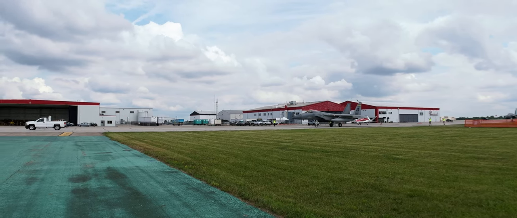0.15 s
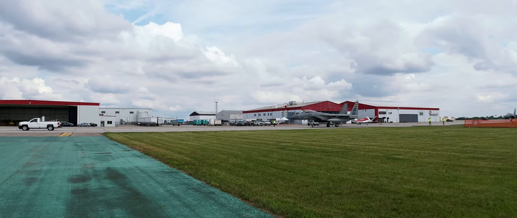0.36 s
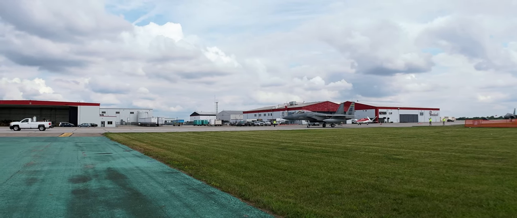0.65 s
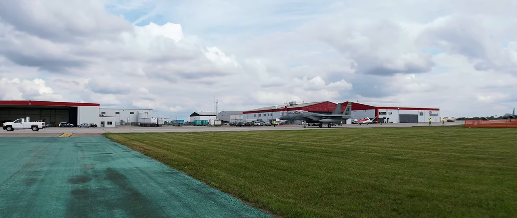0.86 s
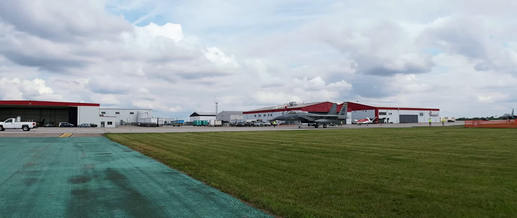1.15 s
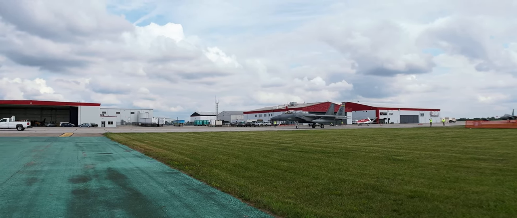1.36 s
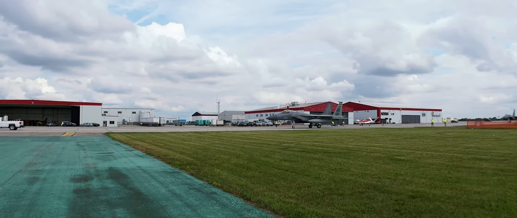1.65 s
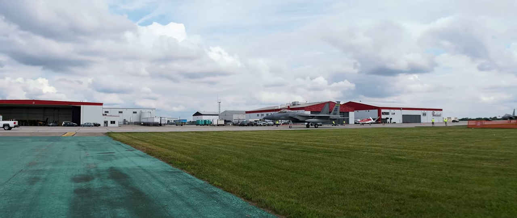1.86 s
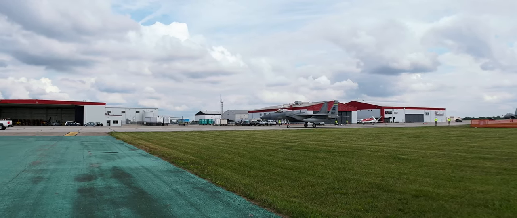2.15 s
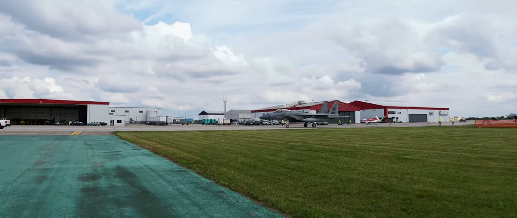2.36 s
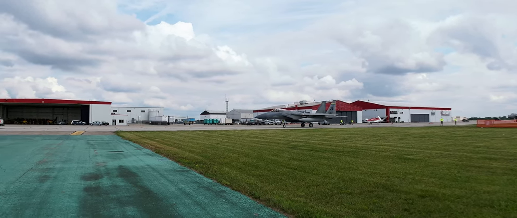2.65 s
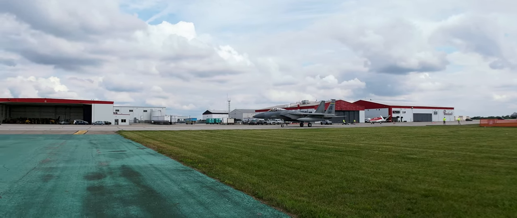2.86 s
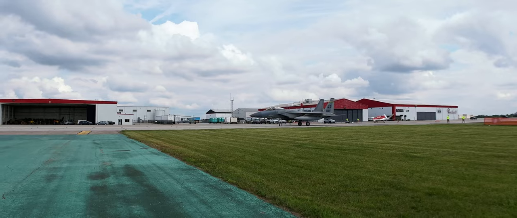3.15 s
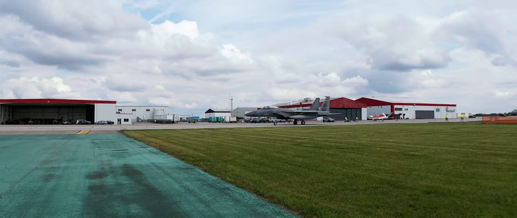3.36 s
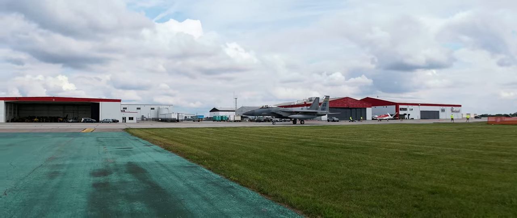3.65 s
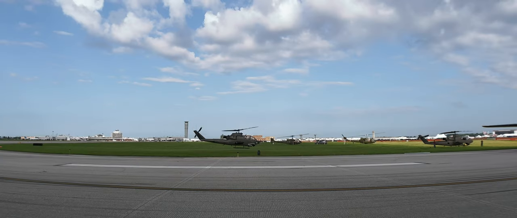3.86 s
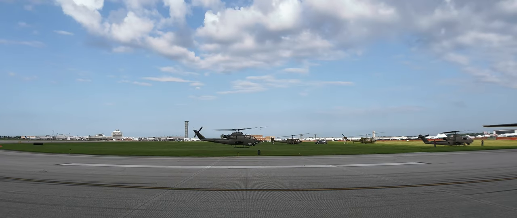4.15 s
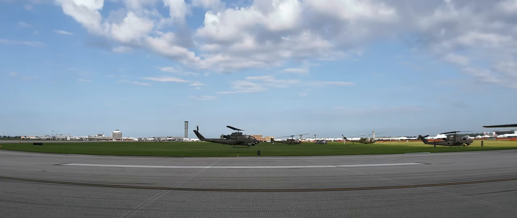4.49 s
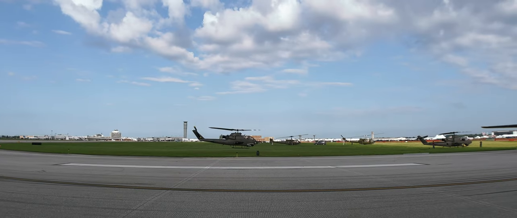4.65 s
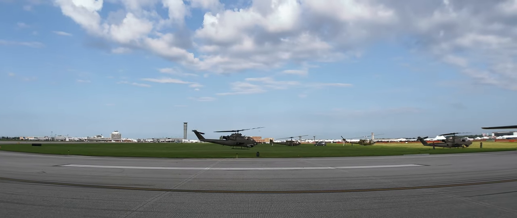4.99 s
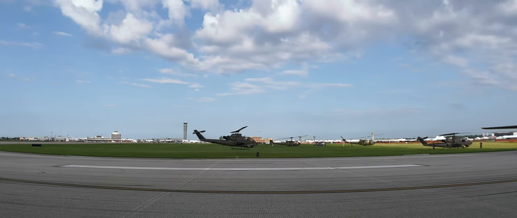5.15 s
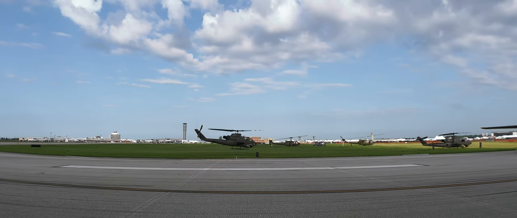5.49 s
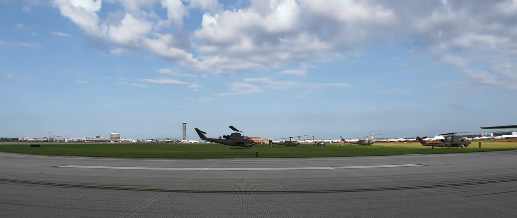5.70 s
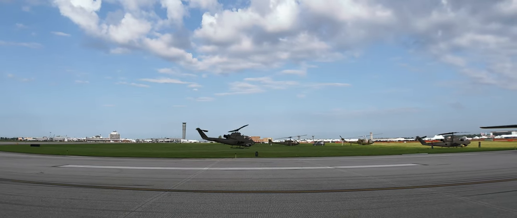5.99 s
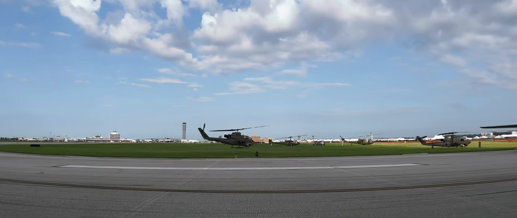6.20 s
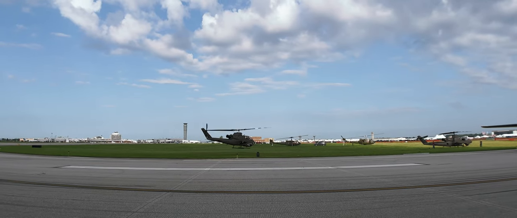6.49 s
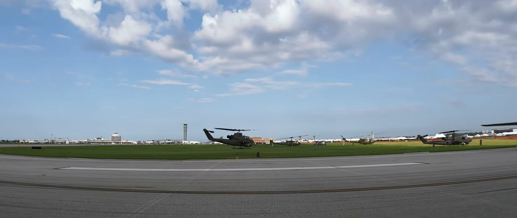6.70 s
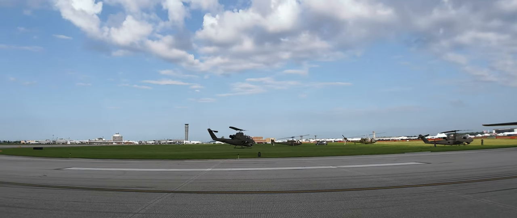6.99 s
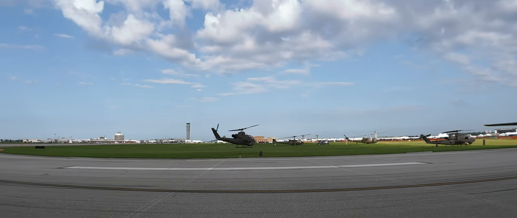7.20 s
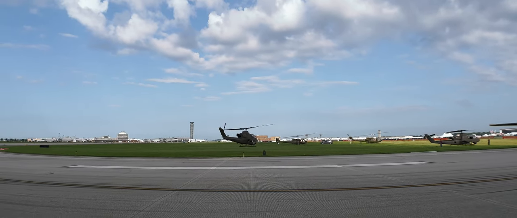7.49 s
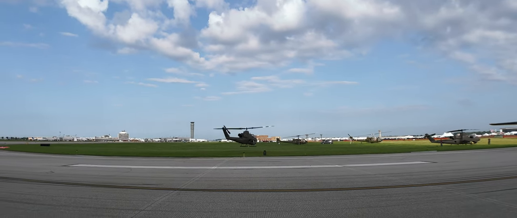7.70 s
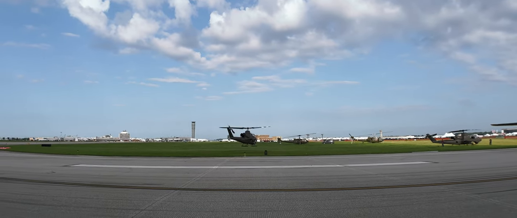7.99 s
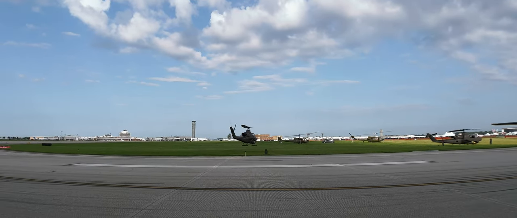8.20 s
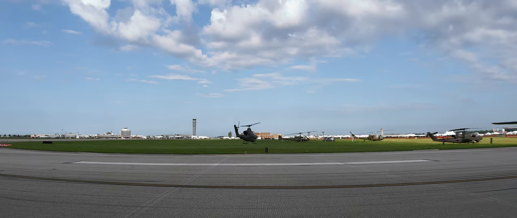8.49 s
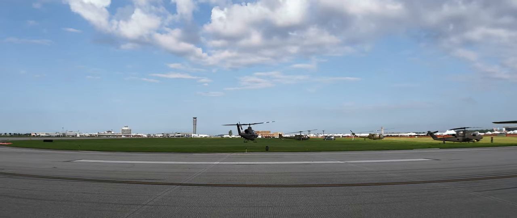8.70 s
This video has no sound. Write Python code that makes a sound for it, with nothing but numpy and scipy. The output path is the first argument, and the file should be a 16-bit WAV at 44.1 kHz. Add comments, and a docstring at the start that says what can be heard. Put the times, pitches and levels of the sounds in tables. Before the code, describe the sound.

On an open airfield, a jet taxis by with fluttering, breathy turbine whines, hiss and a low distant roar while wind gusts thump the microphone. A hard cut brings a hovering helicopter: fast even rotor thumps and swishes, buzzing tail rotor hum, churning air and exhaust. Scattered sharp cracks and a sinking roar follow, then dry blade slaps hit on every pass to the end.

```python
"""An airfield heard from its open edge on two close microphone ports, in two scenes joined by a hard cut.
First a fighter jet taxis by: narrow bands of noise make its turbine whines, beside hiss, roar and wind on the microphone.
Then a two-bladed helicopter hovers and turns: blade pulses thump and gated noise swishes 11 times a second, while
tail rotor harmonics and ragged noise hum and rasp at 55 Hz against those of a parked helicopter.
Volleys of cracks make sharp blade slaps, scattered at first, then on every pass of the main rotor."""
import sys
import numpy as np
from scipy import signal
from scipy.fft import rfft, irfft, next_fast_len
from scipy.io import wavfile
from scipy.ndimage import uniform_filter1d

SR = 44100
rng = np.random.default_rng(int(sys.argv[2]) if len(sys.argv) > 2 else 0)


def materialize(psi):
    """Save the field psi as 16-bit PCM at rate SR to the path in sys.argv[1].

    A 1-D psi becomes a single channel; in a 2-D psi each row is a channel.
    """
    bounded = np.clip(np.atleast_2d(psi).T, -1, 1)
    quanta = np.round(bounded * 32767).astype(np.int16)
    wavfile.write(sys.argv[1], SR, quanta)


N = 389844
T = np.arange(N) / SR  # time [s]
CUT_S = 3.838  # the jet gives way to the helicopter


def undb(db):
    """Decibels to gain."""
    return 10 ** (np.asarray(db) / 20)


def unit(x):
    """Scale to rms 1."""
    return x / np.sqrt(np.mean(x ** 2))


def curves(table):
    """Each column of a table, joined by straight lines in time."""
    s, *columns = np.transpose(table)
    return [np.interp(T, s, column) for column in columns]


def over_bins(points, size):
    """(Hz, value) points on the bins of an FFT, joined on a log-frequency axis."""
    hz, value = np.transpose(points)
    bins_hz = np.arange(size // 2 + 1) * SR / size
    return np.interp(np.log(bins_hz + 1), np.log(hz), value)


def colour(x, points, size=8192):
    """Minimum-phase filter with the given spectrum: the lows of a pulse arrive last."""
    cepstrum = irfft(np.log(undb(over_bins(points, size))))
    # folding the cepstrum forwards makes the filter causal
    cepstrum[1:size // 2] *= 2
    cepstrum[size // 2 + 1:] = 0
    response = irfft(np.exp(rfft(cepstrum)))
    return signal.oaconvolve(x, response)[:N]


def noise(points):
    """Turbulence with the given spectrum, rms 1."""
    return unit(colour(rng.standard_normal(N), points))


def walk(rate):
    """Random levels held for 1 / rate s and smoothed twice; rms 1."""
    hold = max(int(SR / rate), 1)
    steps = np.repeat(rng.standard_normal(N // hold + 1), hold)
    smooth = uniform_filter1d(uniform_filter1d(steps, hold), hold)
    return unit(smooth[:N])


def grit(points, rate, rough_db):
    """Turbulence that arrives in short clumps with hollows between them; rms 1."""
    clumps = undb(rough_db * walk(rate)) * rng.standard_normal(N)
    return unit(colour(clumps, points))


def whine(hz, width_hz, steady=0):
    """A blade tone smeared into a narrow band by turbulent air; steady (0-1) evens out its level."""
    size = next_fast_len(N)
    f = np.arange(size) * SR / size
    band = (1 + (1.6 * (f - hz) / width_hz) ** 2) ** -1.4
    # positive frequencies alone give a complex tone, whose magnitude is its envelope
    tone = np.fft.ifft(np.fft.fft(rng.standard_normal(size)) * band)[:N]
    return unit(tone.real / np.abs(tone) ** np.clip(steady, 0, 1))


def bursts(events):
    """A bell-shaped swell for each (s, dB, half length s) event."""
    out = np.zeros(N)
    for s, db, half in events:
        near = slice(*np.searchsorted(T, [s - 10 * half, s + 10 * half]))
        out[near] += undb(db) * np.exp(-((T[near] - s) / half) ** 2 / 2)
    return out


def with_energy(x, envelope, size=2400):
    """Give each separate burst in x the energy of its envelope, averaged over size samples."""
    wanted, found = (np.abs(uniform_filter1d(v ** 2, size)) for v in (envelope, x))
    return x * np.sqrt(wanted / (found + 1e-12))


def gate(turns, depth_db, rise=0.42):
    """A swell that peaks at each whole blade count and rises for a share of the cycle; rms 1."""
    rise = np.clip(rise, .05, .95)
    cycle = (turns + rise) % 1
    triangle = np.minimum(cycle / rise, (1 - cycle) / (1 - rise))
    return unit(undb(depth_db * triangle))


def pulses(turns, scatter_db):
    """One pressure pulse for each passing blade, each with its own size."""
    blade_count = np.floor(turns)
    passes = np.diff(blade_count, prepend=blade_count[0])
    return passes * undb(scatter_db * rng.standard_normal(N))


def jet():
    """Turbine whines and intake hiss that flutter in the moving air, over a low roar."""
    # levels as the jet passes, before the offsets below: (time [s], whine [dB], hiss [dB])
    jet_levels = [(0.0, -27, -35), (0.12, -23, -36.5), (0.19, -23, -33), (0.87, -26, -33.5),
                  (1.06, -28.5, -41), (1.2, -31.5, -38), (1.48, -33, -44), (1.57, -29.5, -36.5),
                  (1.87, -29, -39.5), (2.12, -24, -32), (2.42, -34, -43), (2.79, -27, -38.5),
                  (3.11, -34, -43), (3.2, -29.5, -39), (3.54, -33, -41), (3.8, -31.5, -40)]
    # spectra of the near hiss and of the distant roar: (frequency [Hz], level [dB])
    hiss_spectrum = [(2000, -26.5), (3400, -15), (4000, -8), (5000, -3.5), (5600, 6.5), (6300, -7.5),
                     (7300, -2.5), (8200, -16), (10000, -6.5), (12000, -19), (13100, -23), (14000, -64)]
    roar_spectrum = [(40, -12), (90, 9.5), (250, -15), (600, -9.5), (1000, -9.5), (1300, 3.5), (1600, -5.5),
                     (1900, -4), (2300, 0.5), (3200, -1), (6000, -33)]
    fan_hz, compressor_hz = 2786, 4495
    fan_db, compressor_db, hiss_offset_db = -5, -2, 4.5  # against the whine and hiss levels

    whine_db, hiss_db = curves(jet_levels)
    flutter = walk(80)  # shared by compressor and hiss
    broad_fan = whine(fan_hz, width_hz=210, steady=0.14)
    narrow_fan = whine(fan_hz, width_hz=4.9, steady=0.61)
    fan = undb(whine_db + fan_db + 0.65 * walk(60)) * (broad_fan + undb(-7) * narrow_fan)
    compressor_tone = whine(compressor_hz, width_hz=344, steady=0.089)
    compressor = undb(whine_db + compressor_db + 0.95 * flutter) * compressor_tone
    # the low whine follows only a quarter of the whine's rise and fall in dB
    low_whine_db = -49.0 + .25 * (whine_db - whine_db.mean()) + .5 * walk(8.1)
    low_whine = undb(low_whine_db) * whine(hz=1554, width_hz=270)
    hiss = undb(hiss_db + hiss_offset_db + 0.38 * flutter) * noise(hiss_spectrum)
    roar = undb(-45.0 + walk(9.06)) * noise(roar_spectrum)
    return fan + compressor + low_whine + hiss + roar


def wind():
    """Eddies rumble on the microphone; a strong one bursts as a puff and leaves a brief rumble behind."""
    # two gusts, then a light breeze: (time [s], level [dB], unevenness [dB])
    wind_levels = [(0, -25, 2), (.12, -32, -1), (.17, -35, 4.5), (.42, -37, 0.5), (.56, -31, 4),
                   (.69, -29, 2.5), (.76, -56, 12), (1.8, -60.5, 9), (2.7, -50, 2.5), (3.8, -47, 4.5)]
    # spectrum of the steady rumble: (frequency [Hz], level [dB])
    wind_spectrum = [(20, -26), (32, -18), (50, 0), (85, 5.5), (150, -1.5), (280, -8.5), (450, -15.5),
                     (900, -51), (3000, -77)]
    # separate eddies: (time [s], front level [dB], trailing rumble level [dB])
    eddy_events = [(0.025, -31, -31), (0.048, -31, -42), (0.077, -28, -25), (0.121, -27, -35),
                   (0.193, -30.5, -42), (0.267, -33, -42), (0.294, -33.5, -40), (0.495, -36, -33),
                   (0.551, -27.5, -26), (0.598, -40, -39), (0.638, -34, -37), (0.679, -23.5, -43),
                   (0.754, -41, -51.0), (0.815, -37, -53), (1.106, -36, -40), (1.164, -36, -39),
                   (1.227, -47, -47), (1.325, -43, -43), (1.345, -46, -47), (1.383, -50, -46),
                   (1.449, -41, -45), (1.478, -45, -54), (1.812, -43, -56), (1.965, -41, -48),
                   (1.993, -36, -40), (2.033, -48, -46), (2.224, -40.5, -39), (2.256, -46, -57),
                   (2.428, -43, -58), (2.501, -35, -47), (2.592, -38, -40), (2.654, -38.5, -44),
                   (2.707, -43, -51), (2.735, -43, -48), (2.873, -42.5, -43), (3.05, -42, -54),
                   (3.194, -40, -48.0), (3.279, -39, -43.0), (3.313, -40, -47), (3.34, -42, -51),
                   (3.377, -37, -42), (3.439, -51, -48), (3.525, -44, -52), (3.565, -46, -42),
                   (3.801, -36, -38)]
    # spectra of a front in a gust, a front in a breeze, and the trailing rumble: (frequency [Hz], level [dB])
    gust_spectrum = [(60, -26), (150, -4), (250, 8), (380, -7.5), (600, -16.5), (1200, -38)]
    breeze_spectrum = [(60, -27), (150, -2.5), (260, 0.5), (500, -3.5), (800, -11), (1500, -42)]
    wake_spectrum = [(20, -36), (50, -0.5), (90, 1.5), (160, -2.5), (280, -16.5), (600, -46)]
    front_half_s, wake_half_s, wake_lag_s = 0.0043, 0.012, 0.015
    full_gust_db, small_puff_db = -34, -58
    buffets_per_s = 25  # how fast the wind wavers

    wind_db, uneven_db = curves(wind_levels)
    rumble = undb(wind_db + uneven_db * walk(buffets_per_s)) * noise(wind_spectrum)
    fronts = bursts([(s, db, front_half_s) for s, db, _ in eddy_events])
    wakes = bursts([(s + wake_lag_s, db, wake_half_s) for s, _, db in eddy_events])
    # the eddies of a gust are larger and so duller
    gust = np.clip(undb(wind_db - full_gust_db), 0, 1)
    eddies = np.sqrt(gust) * noise(gust_spectrum) + np.sqrt(1 - gust) * noise(breeze_spectrum)
    front_puffs = with_energy(fronts * eddies, fronts)
    wake_rumbles = with_energy(wakes * noise(wake_spectrum), wakes)
    small_puffs = undb(small_puff_db) * grit(breeze_spectrum, rate=54, rough_db=5.0)
    return rumble + front_puffs + wake_rumbles + small_puffs


def main_rotor(blades, thump_db):
    """Each blade pushes out a low thump, and its tip hisses as it swings towards the listener."""
    # spectra of the low thump and of the tip hiss: (frequency [Hz], level [dB])
    thump_spectrum = [(15, -65), (33, -41), (55, -3), (80, 2.5), (130, -13), (230, -4), (350, -3.5),
                      (480, -10.5), (900, -34), (2500, -85)]
    swish_spectrum = [(1500, 16), (3500, -3), (5500, 6), (7500, 12), (10000, 13), (12500, 9.5),
                      (14500, 0.5)]
    swish_start_db, swish_fade_db_per_s = -40, 1  # fading as the helicopter turns away

    blade_pulses = pulses(blades + .02, scatter_db=2.5)
    thump = undb(thump_db) * unit(colour(blade_pulses, thump_spectrum))
    swish_db = swish_start_db - swish_fade_db_per_s * (T - CUT_S)
    tip_hiss = gate(blades, depth_db=17.5, rise=0.34) * noise(swish_spectrum)
    swish = undb(swish_db + 2 * walk(60)) * tip_hiss
    return swish - thump


def harmonics(turns, levels_db, tilt_db=0):
    """One rounded pulse per blade, from the second harmonic up; harmonics are staggered in phase."""
    trail_rad = 8  # lag per unit of log harmonic number
    out = 0
    for k, db in enumerate(levels_db, 2):
        phase = k * (2 * np.pi * turns + .5) - trail_rad * np.log(k)
        out = out + undb(db + tilt_db * (k - 2)) * np.cos(phase)
    return out


def rasp(turns):
    """Every tail blade gives one ragged crack as it cuts the wake, some harder than others; rms 1."""
    # spectrum of the ragged cracks: (frequency [Hz], level [dB])
    rasp_spectrum = [(300, -5.5), (550, 6.5), (800, 13.5), (1100, 5.5), (1450, -6.5), (1800, 4.5),
                     (2300, -2.5), (2800, -6.5), (3400, -20), (8000, -26)]
    cut = gate(turns + .012 * walk(25), depth_db=50, rise=.35)
    torn_air = colour(cut * rng.standard_normal(N), rasp_spectrum)
    cracks = with_energy(torn_air, cut, size=800)
    return unit(cracks * undb(walk(12)))  # strength wavers by 1 dB rms


def tail_rotor(turns, rasp_db):
    """Small fast blades: thickness makes a pulse train that brightens as it grows, thrust a drone, wake a rasp."""
    # louder as the tail swings round, before the hum offset: (time [s], hum [dB], drone [dB])
    tail_levels = [(3.84, -39.5, -41), (4.6, -37.5, -45), (5.8, -37.5, -40), (6.7, -31.5, -30),
                   (7.4, -29, -34.5), (8.1, -24.5, -33.5), (8.84, -22.5, -33)]
    # hum harmonics from twice the blade rate upwards: [level, dB]
    tail_harmonics_db = [5.5, 3, 0, -4, -8, -14, -21]
    brighten = 0.18  # dB more for each higher harmonic, per dB of hum
    side_on_db = -25.5  # hum level, before its offset, with the tail side-on

    hum_db, drone_db = curves(tail_levels)
    pulse = harmonics(turns, tail_harmonics_db, brighten * (hum_db - side_on_db))
    hum = undb(hum_db + 2.5 + .4 * walk(11)) * unit(pulse)
    drone = undb(drone_db + walk(4.43)) * np.sqrt(2) * np.cos(2 * np.pi * turns + 1)
    return drone + hum + undb(rasp_db) * rasp(turns)


def parked_helicopter(wash_db):
    """A second tail rotor runs a little faster; its hum and rasp beat against the first."""
    # hum harmonics from twice the blade rate upwards: [level, dB]
    parked_harmonics_db = [-6.5, -1.5, 1.5, -5, -3, -7, -9]
    blade_rate_hz = 58.4
    hum_db, rasp_db = -2.5, -6.5  # against the wash level

    turns = np.cumsum(blade_rate_hz * (1 + .003 * walk(3))) / SR
    hum = undb(hum_db + 2 * walk(6)) * unit(harmonics(turns, parked_harmonics_db))
    return undb(wash_db) * (hum + undb(rasp_db) * rasp(turns))


def downwash(blades, tail_turns, churn_db, wash_db, exhaust_db):
    """Clumps of torn air and turbine exhaust, fluttering with the tail rotor, throbbing with the main one."""
    # spectra of low churn, wash and turbine exhaust: (frequency [Hz], level [dB])
    churn_spectrum = [(20, -55), (36, -21), (52, 2), (100, -3), (220, 3), (350, -3.5), (480, -15.5),
                      (900, -37), (2000, -47)]
    wash_spectrum = [(150, -3), (400, -1), (750, 1), (1000, -11.5), (1400, -12), (2500, -26.5),
                     (6000, -55.5)]
    exhaust_spectrum = [(600, -3.5), (1200, 3.5), (1750, 3.5), (2400, 0.5), (3300, -9.5), (4200, -6.5),
                        (5200, -1), (6500, -7.5), (8500, -12.5), (14000, -21)]
    wash_offset_db, exhaust_offset_db = 3, 3.5  # against the wash and exhaust levels

    chop = gate(tail_turns, depth_db=2.0, rise=0.12)
    throb = gate(blades, depth_db=2.5) * undb(walk(30))
    churn_clumps = grit(churn_spectrum, rate=65, rough_db=-0.5)
    churn = undb(churn_db) * gate(blades, depth_db=5.5, rise=0.29) * churn_clumps
    wash = undb(wash_db + wash_offset_db) * grit(wash_spectrum, rate=190, rough_db=2.4)
    exhaust = undb(exhaust_db + exhaust_offset_db) * grit(exhaust_spectrum, rate=260, rough_db=1.3)
    return churn + chop * throb * (wash + exhaust)


def surge(blades):
    """A broad resonance of churned air slides downwards, in lumps that throb with the blades."""
    # a roar swells and sinks as the wash sweeps past: (time [s], centre [Hz], level [dB])
    surge_path = [(3.84, 800, -54), (4.5, 780, -40), (4.95, 760, -39), (5.3, 630, -38), (5.52, 380, -31),
                  (5.72, 272, -27), (5.9, 220, -34), (6.2, 200, -49), (7, 200, -58)]
    width_octaves, lumps_db = 0.47, 2.5

    centre_hz, surge_db = curves(surge_path)
    out = power = 0
    # half-octave bands of noise are faded in and out around the moving centre
    for hz in 150 * 2 ** (np.arange(7) / 2):
        edges_hz = [hz / 2 ** .25, hz * 2 ** .25]
        band_filter = signal.butter(2, edges_hz, "bandpass", fs=SR, output="sos")
        band = signal.sosfilt(band_filter, rng.standard_normal(N))
        weight = np.exp(-(np.log2(hz / centre_hz) / width_octaves) ** 2 / 2)
        out = out + weight * unit(band)
        power = power + weight ** 2
    level = undb(surge_db + lumps_db * walk(45))
    return level * gate(blades, depth_db=0.5) * out / np.sqrt(power)


def blade_slaps():
    """Sharp slaps of the rotor blades, a few early ones from the tail rotor: four dry cracks within ms."""
    # slaps, scattered at first, then on every pass, with the sharpest run in mid-scene:
    # (time [s], thud [dB], bark [dB], crack [dB], snap [dB], half length [s])
    slap_events = [(4.015, -29, -41, -32, -48, 0.003), (4.212, -33, -26, -23, -25, 0.00073),
                   (4.914, -27, -19, -32, -48, 0.0028), (4.946, -29, -19.5, -34, -42, 0.0023),
                   (5.125, -16, -20, -15.5, -23.5, 0.00064), (5.3405, -32, -21.5, -27, -45, 0.0021),
                   (5.495, -11.5, -25.5, -31, -39, 0.0035), (5.5485, -18, -22, -35, -44.5, 0.0026),
                   (5.684, -17, -40, -32, -41, 0.0035), (5.779, -17, -34, -41, -49, 0.004),
                   (5.867, -19, -32, -38, -44.0, 0.0048), (5.9569, -20.0, -45, -41.5, -47.5, 0.0042),
                   (6.8561, -24, -30, -41, -41, 0.0034), (6.985, -26, -20.5, -35, -48, 0.0026),
                   (7.0767, -19, -20.5, -28.5, -46, 0.0024), (7.169, -22, -23.5, -29.5, -38, 0.0036),
                   (7.2616, -16, -19, -29.5, -30.5, 0.0029), (7.3535, -16.5, -18, -22.5, -28.5, 0.0041),
                   (7.4444, -15, -17.5, -21.5, -30.5, 0.0034), (7.5395, -12.5, -19.0, -23, -31.5, 0.0041),
                   (7.6304, -20.5, -16.0, -19.5, -30.5, 0.0035), (7.721, -16, -19, -27, -37, 0.0032),
                   (7.8172, -17.5, -18.5, -26, -36, 0.0044), (7.9067, -12.5, -27, -29, -36.5, 0.0043),
                   (8.001, -15.5, -23.5, -26.5, -38, 0.0044), (8.09, -17.5, -20, -25.0, -36, 0.0038),
                   (8.1844, -13.5, -17, -26.5, -39.5, 0.0036), (8.2746, -15.5, -21, -28, -39.0, 0.0048),
                   (8.3693, -18.5, -28, -31, -40, 0.0055), (8.462, -16, -25.5, -28, -42, 0.0052),
                   (8.554, -20, -24, -28, -40, 0.0056), (8.645, -18.5, -32, -31.5, -41.5, 0.0057),
                   (8.7377, -21.5, -28, -33, -42, 0.005), (8.8306, -13.5, -17.5, -31.5, -40, 0.0031)]
    # spectrum of a volley before its bands are levelled: (frequency [Hz], level [dB])
    slap_spectrum = [(70, -28), (150, -5.5), (240, 0), (370, -0.5), (470, -7), (580, -3.5), (800, 1),
                     (930, -6), (1080, -10), (1300, -7), (1800, -6), (2400, -11), (3000, -20.5),
                     (3600, -24), (4200, -19), (5400, -18), (7500, -34), (13000, -33)]
    # limits of the thud, bark, crack and snap bands: [frequency, Hz]
    slap_edges_hz = [130, 480, 1080, 3200, 12000]
    jitter, scatter_db = .2, 2  # crack timing (share of the half length) and size
    shred_db = -11  # torn air between the cracks

    cracks = np.zeros(N + SR // 10)
    chances = rng.standard_normal((len(slap_events), 2, 4))
    for (s, *_, half), (late, size) in zip(slap_events, chances):
        place = np.linspace(-1, 1, num=4) + jitter * late
        samples = ((s + half * place) * SR).astype(int)
        sizes = undb(scatter_db * size) * np.exp(-place ** 2 / 2)
        cracks[samples] += sizes * np.sqrt(abs(half) * SR / 2)
    shreds = bursts([(s, shred_db, half) for s, *_, half in slap_events]) * rng.standard_normal(N)
    volleys = colour(cracks[:N] + shreds, slap_spectrum)
    out = 0
    for k, edges in enumerate(zip(slap_edges_hz, slap_edges_hz[1:])):
        band_filter = signal.butter(3, edges, "bandpass", fs=SR, output="sos")
        # a trace of noise keeps the silent stretches from being exactly empty
        band = signal.sosfiltfilt(band_filter, volleys + 1e-9 * rng.standard_normal(N))
        envelope = bursts([(s, db[k], half) for s, *db, half in slap_events])
        out = out + with_energy(band, envelope, size=1800)
    return out


def helicopter():
    """Both rotors, a parked neighbour, churned air, the turbine's whistle and a faint gearbox tone."""
    # hovering, before the offsets of each part: (time [s], wash [dB], turbine exhaust [dB])
    hover_levels = [(3.87, -31.5, -38.5), (4.08, -33.5, -40), (4.28, -39.5, -39), (4.98, -34.5, -36.5),
                    (5.49, -29.5, -38), (6.05, -32.5, -40.5), (6.75, -34, -43.5), (7.92, -43, -42.5),
                    (8.39, -42.5, -43), (8.8, -45, -45)]
    # turning: (time [s], low churn [dB], tail rasp [dB], turbine whistle [dB], main rotor thump [dB])
    turn_levels = [(3.84, -25, -35, -52, -35), (4.25, -29.5, -42, -46.5, -46),
                   (4.6, -26.5, -30, -42.5, -45), (4.9, -29, -29, -47, -41), (5.3, -29, -31, -50, -27.5),
                   (5.52, -28.5, -29.5, -51, -35), (5.78, -26.5, -42, -52, -39),
                   (6.0, -30, -44, -65, -34.5), (7.2, -30.5, -58, -69, -37), (8.0, -31.5, -62, -63, -27),
                   (8.84, -32, -63, -68, -41)]
    # tail rotor speed: (time [s], blade rate [Hz])
    tail_speed = [(3.84, 55.15), (5.8, 55.35), (8.84, 54.85)]
    # main rotor: a blade passes at blade_pass_s, when the blade rate is blade_hz
    blade_hz, speed_up_hz_per_s, blade_pass_s = 10.843, .0113, 8.0
    whistle_hz, gearbox_hz = 12266, 1686
    gearbox_db = -8.5  # against the exhaust level

    since = T - blade_pass_s
    blades = blade_hz * since + speed_up_hz_per_s * since ** 2 / 2
    tail_hz, = curves(tail_speed)
    tail_turns = np.cumsum(tail_hz) / SR
    wash_db, exhaust_db = curves(hover_levels)
    churn_db, rasp_db, whistle_db, thump_db = curves(turn_levels)
    whistle = undb(whistle_db + 2 * walk(35)) * whine(whistle_hz, width_hz=110)
    gearbox = undb(exhaust_db + gearbox_db) * whine(gearbox_hz, width_hz=46)
    rotors = main_rotor(blades, thump_db) + tail_rotor(tail_turns, rasp_db) + blade_slaps()
    air = downwash(blades, tail_turns, churn_db, wash_db, exhaust_db) + surge(blades)
    return rotors + parked_helicopter(wash_db) + air + whistle + gearbox


def microphones(x, size=1024):
    """Two close ports hear the sound with a phase and level difference, plus a diffuse side part."""
    # by which left leads right: (frequency [Hz], phase [rad])
    port_phase = [(60, 0), (500, .1), (1030, .35), (1550, 1.1), (1900, -.1), (2900, .3), (4800, 0),
                  (5800, -.85), (6900, -1.2), (8200, -3.0), (8800, -3.3), (10000, -4.6), (11300, -6.1),
                  (12700, -6.4), (14500, -9)]
    # left minus right: (frequency [Hz], level difference [dB])
    port_balance = [(100, 0), (250, .7), (900, .4), (1300, -2), (1700, -4.5), (2300, -1.5), (3000, 0)]
    # diffuse side part, strongest near 1.5 kHz, faint near 4.3 and 12.2 kHz: (frequency [Hz], level [dB])
    side_spectrum = [(60, -29), (130, -26), (250, -20), (800, -12), (1500, -5), (2200, -16), (4300, -28),
                     (6200, -12), (10500, -12), (12200, -24), (14000, -10)]

    # each port takes half of the phase and level difference
    lead = np.exp(.5j * over_bins(port_phase, size)) * undb(over_bins(port_balance, size) / 2)
    side_gain = undb(over_bins(side_spectrum, size))
    heard = []
    for response in (lead, 1 / lead, side_gain):
        kernel = np.roll(irfft(response), size // 2)
        heard.append(signal.oaconvolve(x, kernel)[size // 2:size // 2 + N])
    left, right, diffuse = heard
    smear = rng.standard_normal(SR // 4) * np.exp(-T[:SR // 4] / .06)  # decays over 0.06 s
    side = signal.oaconvolve(diffuse, smear / np.linalg.norm(smear))[:N]
    return np.array([left + side, right - side])


def scene():
    """The jet in the wind, then a hard cut to the helicopter."""
    second_scene = np.clip((T - CUT_S) / 0.0024, 0, 1)
    return microphones((1 - second_scene) * (jet() + wind()) + second_scene * helicopter())


def record(dry):
    """Soft saturation rounds the loudest peaks and a steep low-pass cuts the top."""
    top_hz = 14600
    rounded = np.tanh(1.19 * dry) / 1.34
    return signal.sosfilt(signal.ellip(8, .2, 70, top_hz, fs=SR, output="sos"), rounded)


dry = scene()
out = record(dry)
materialize(out)
```